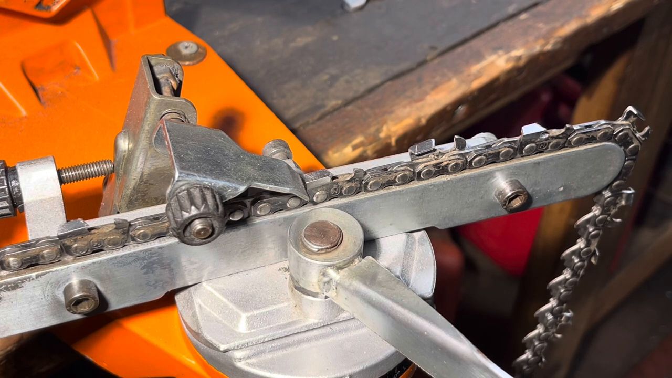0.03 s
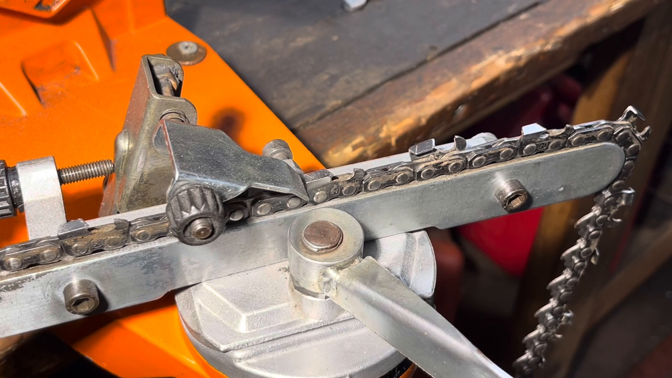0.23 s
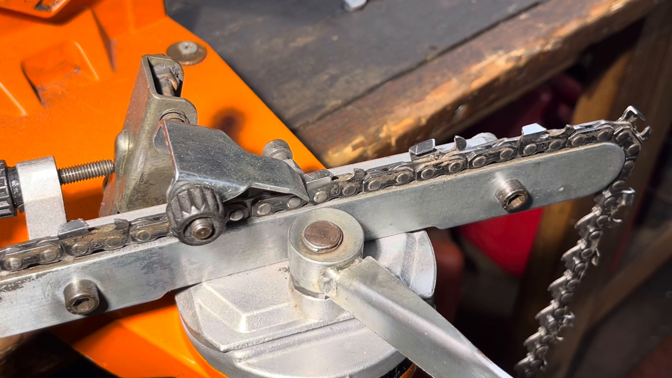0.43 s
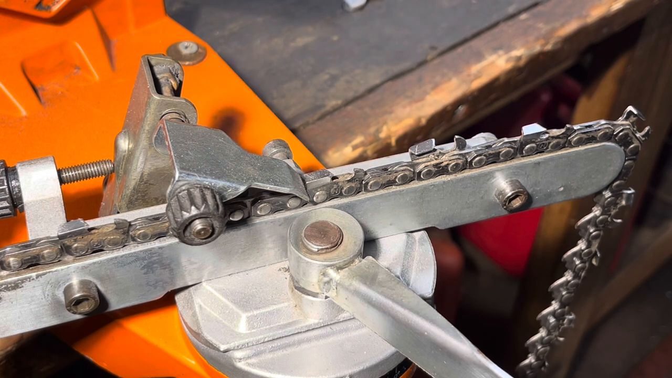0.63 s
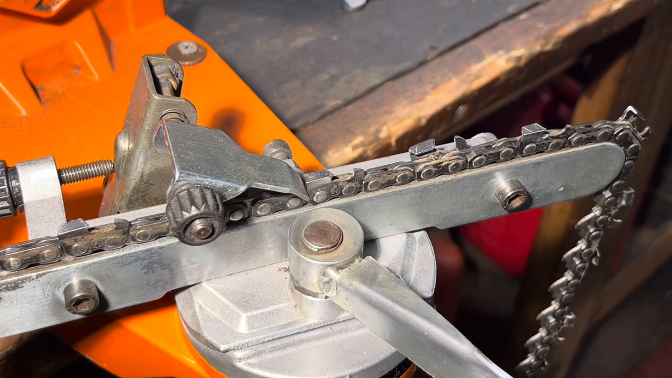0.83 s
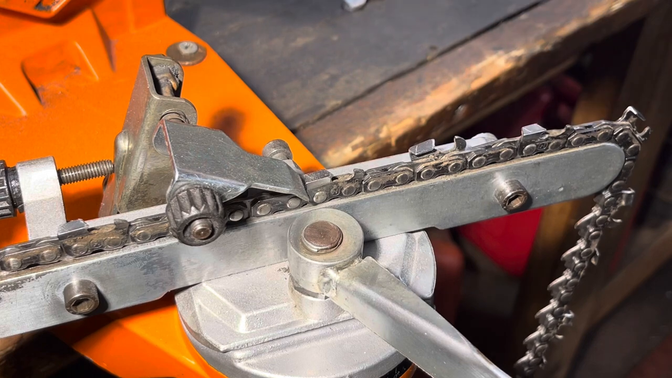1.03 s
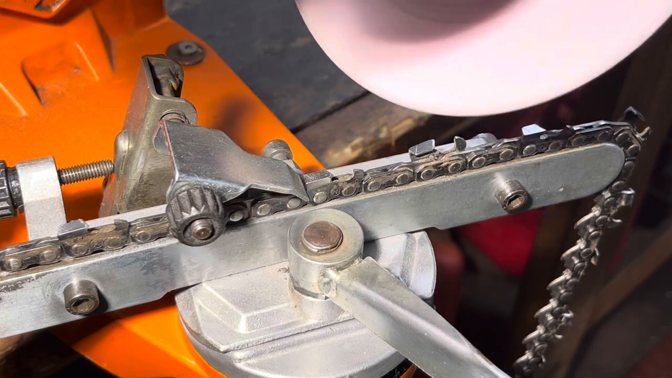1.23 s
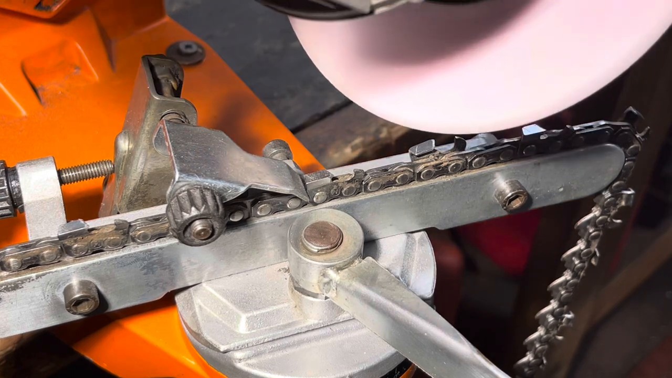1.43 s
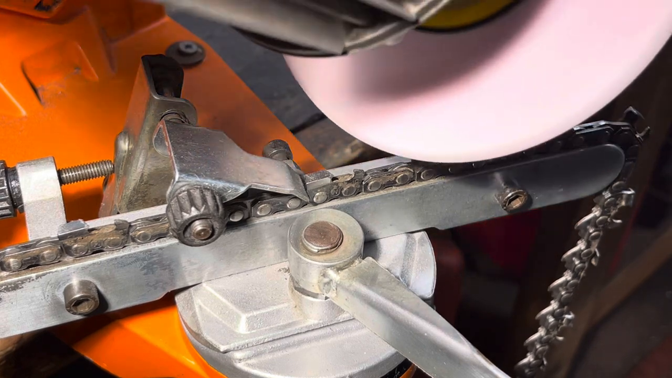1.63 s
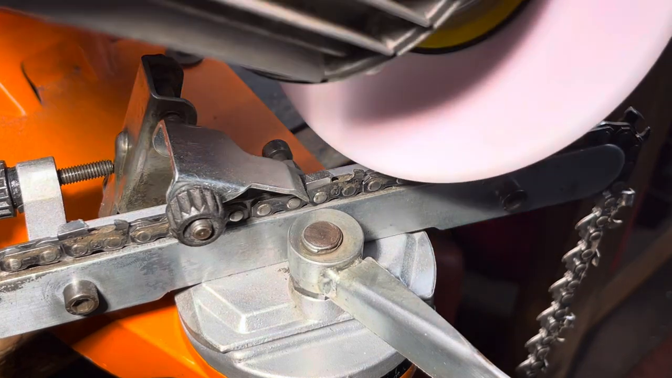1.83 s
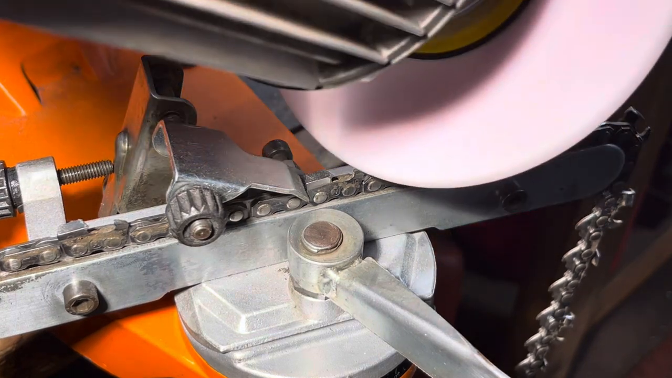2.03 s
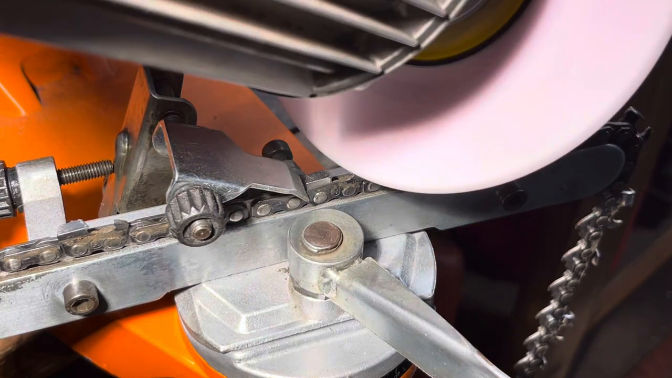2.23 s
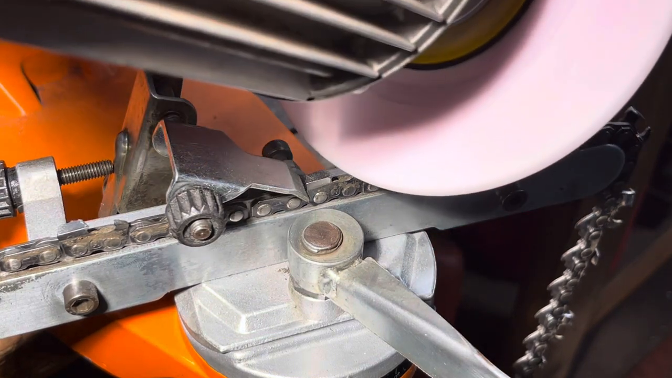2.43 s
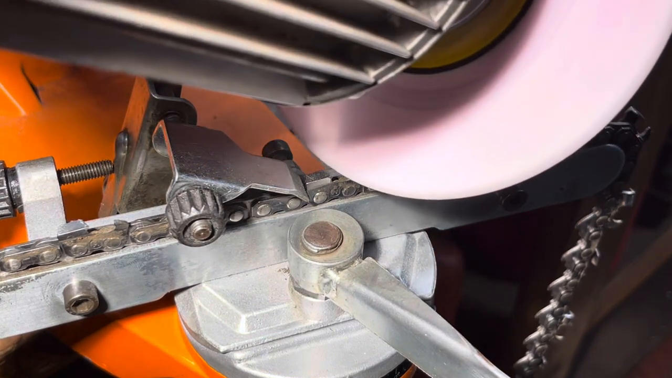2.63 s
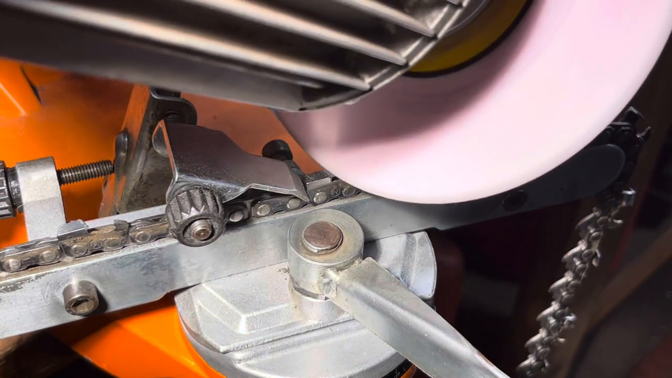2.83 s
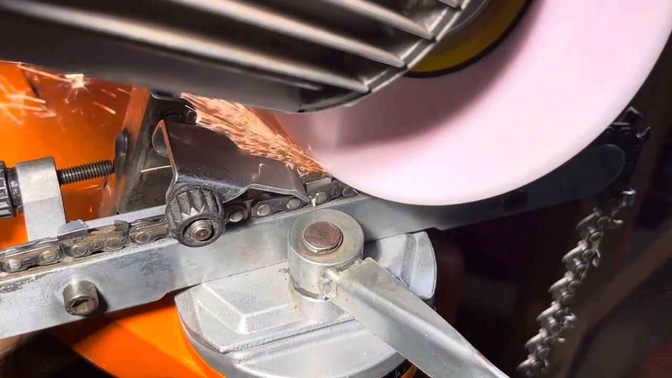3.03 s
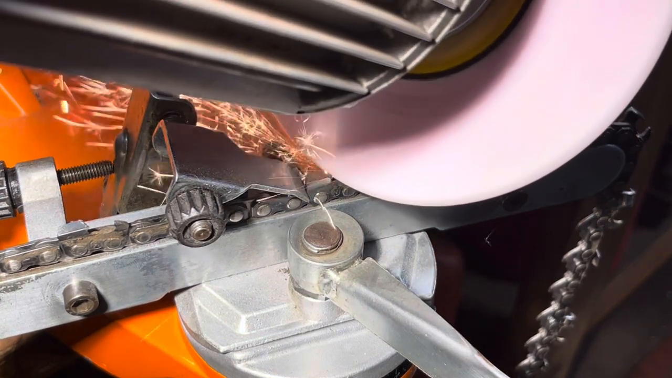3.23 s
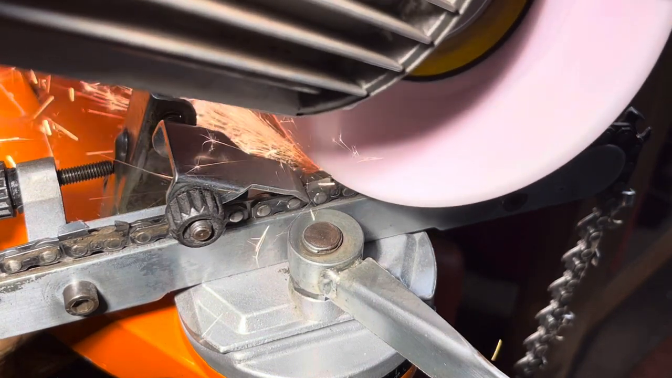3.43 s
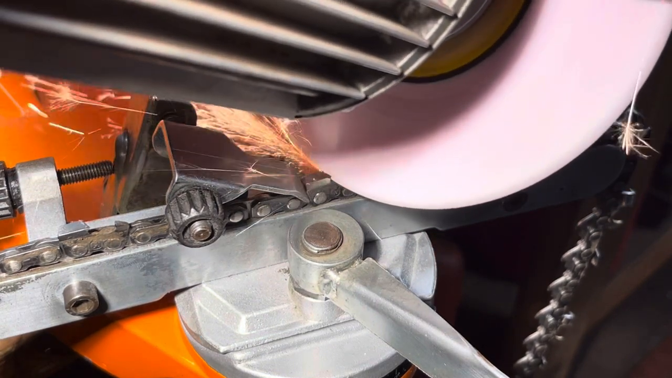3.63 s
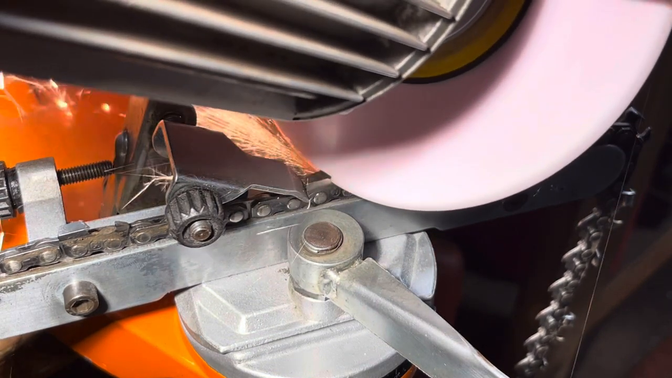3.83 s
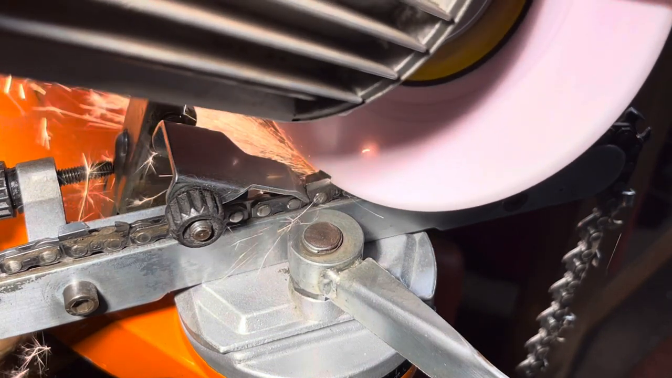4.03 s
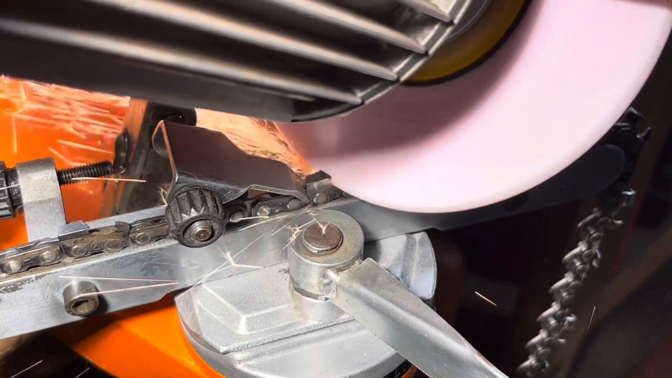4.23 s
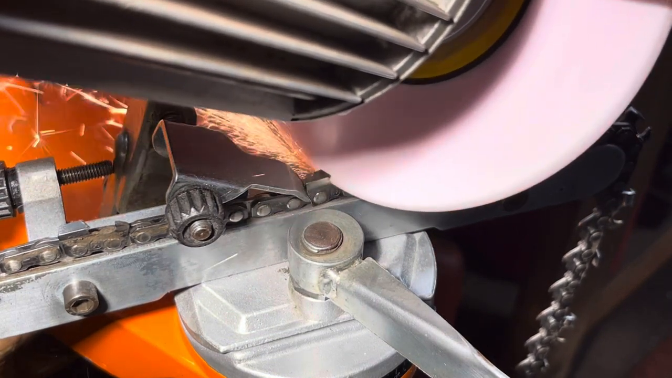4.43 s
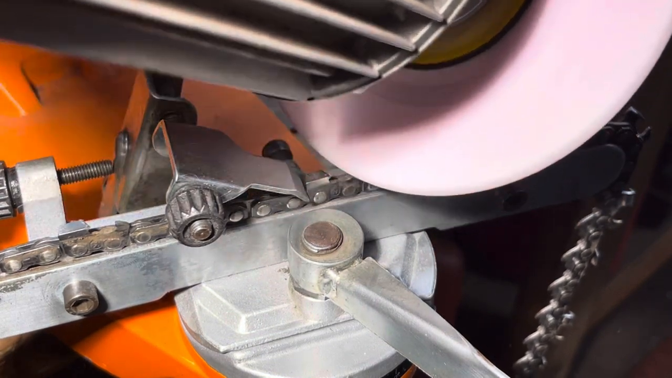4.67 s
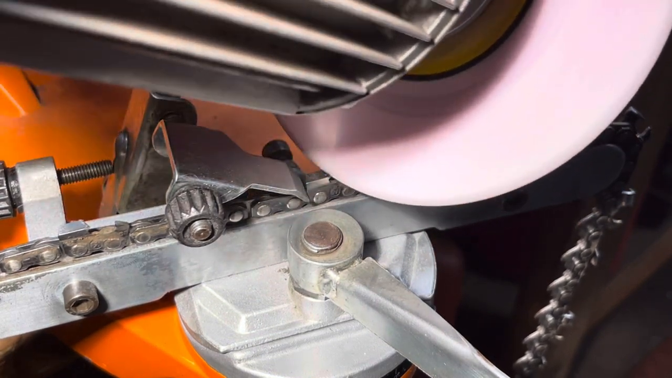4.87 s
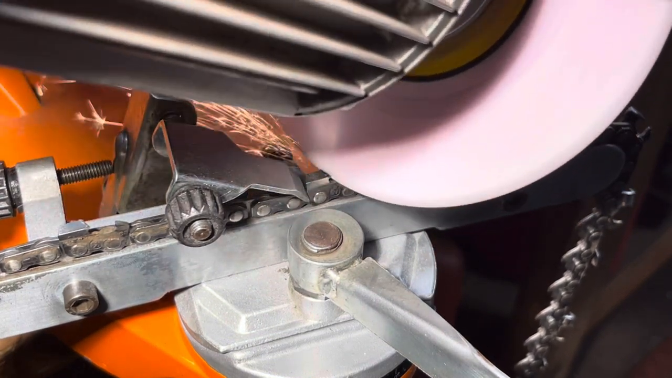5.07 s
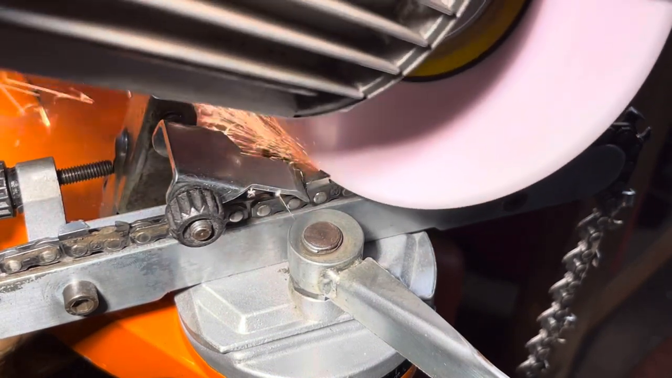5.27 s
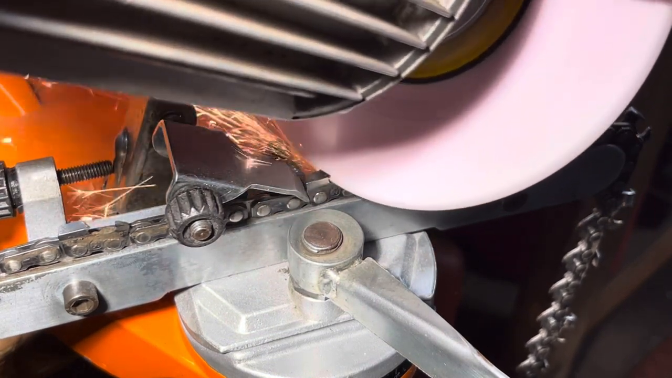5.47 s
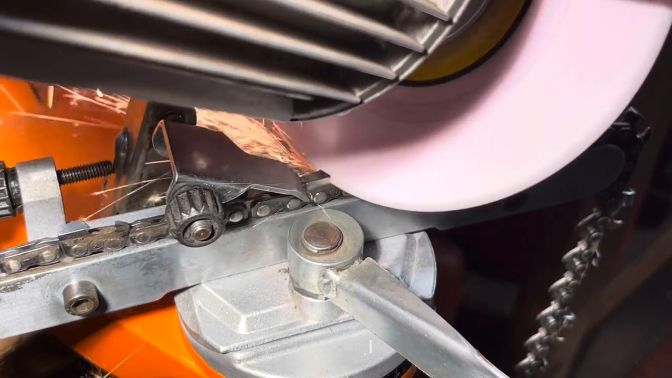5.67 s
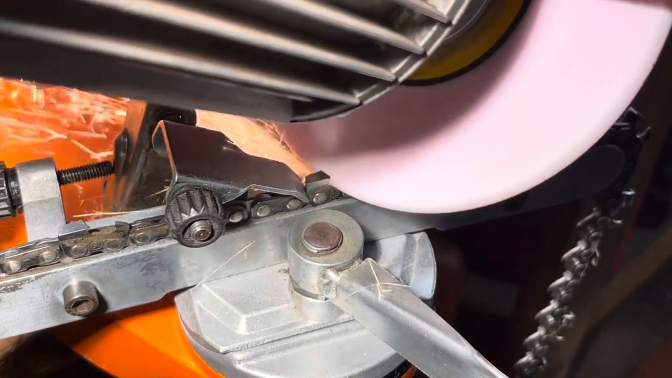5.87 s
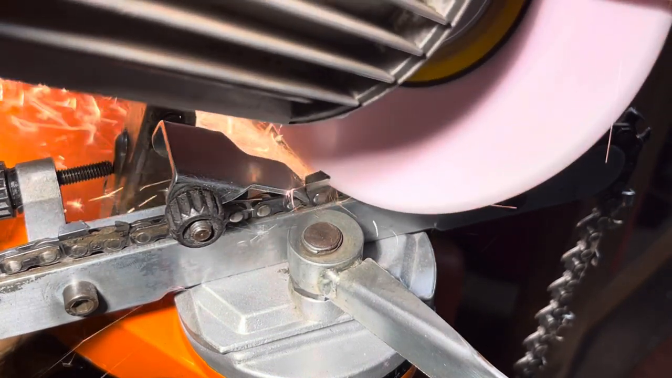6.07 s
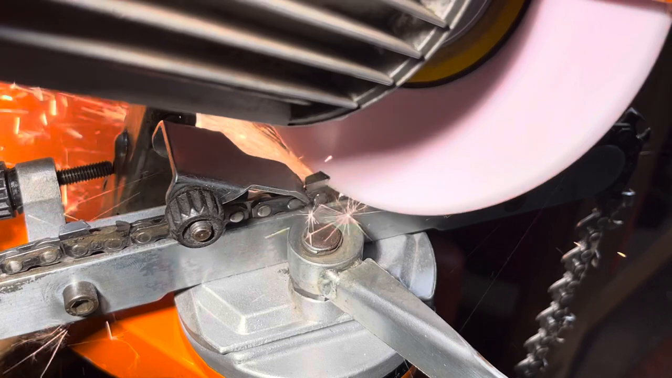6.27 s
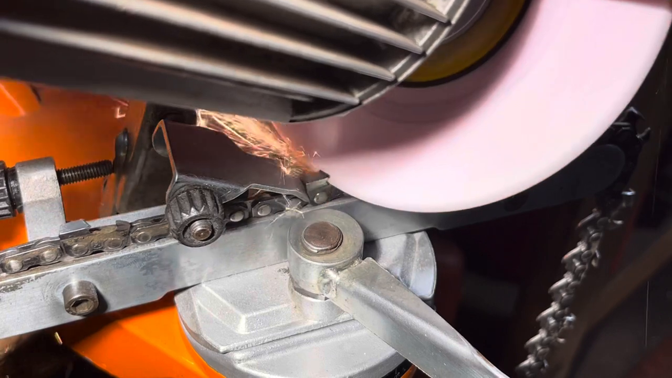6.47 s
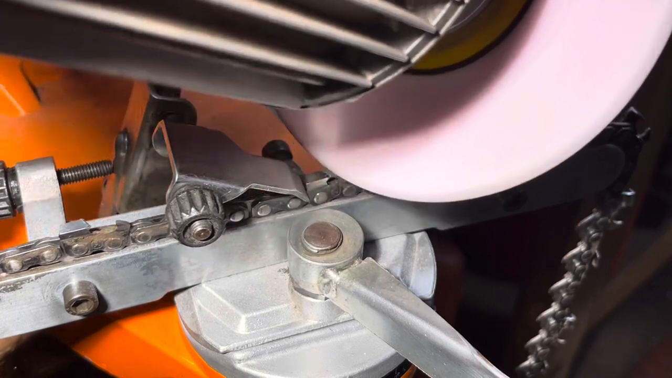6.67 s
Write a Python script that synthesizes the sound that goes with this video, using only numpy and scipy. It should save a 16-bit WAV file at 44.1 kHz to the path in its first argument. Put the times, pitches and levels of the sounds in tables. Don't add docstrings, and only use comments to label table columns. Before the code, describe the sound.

A bench grinder motor growls up to speed and hums, then its abrasive wheel rasps loudly on a saw chain tooth in two harsh, squealing cuts.

```python
import sys
import numpy as np
from scipy import signal
from scipy.fft import rfft, irfft, next_fast_len
from scipy.io import wavfile
from scipy.ndimage import uniform_filter1d, minimum_filter1d, map_coordinates

SR = 44100
rng = np.random.default_rng(int(sys.argv[2]) if len(sys.argv) > 2 else 0)


def to_wav(sig):
    pcm = np.clip(np.atleast_2d(sig), -1, 1) * 32767
    pcm = np.round(pcm).astype(np.int16)
    wavfile.write(sys.argv[1], SR, pcm.T)


def elevation(decibels):
    levels = np.asarray(decibels, float)
    return 10 ** (levels / 20)


N = 295514
T = np.arange(N) / SR

# t/s, rumble level/dB
RUMBLE_LEVEL = [(0, -64.5), (.09, -58), (.26, -43.5), (.43, -41), (1.0, -39.5), (1.3, -36.5), (1.6, -36.5),
                (2.86, -34.5)]
# t/s, speed/Hz
RUN_UP = [(0, 12), (.115, 18), (.15, 32), (.2, 47), (.25, 57), (.33, 59.2), (6.7, 59.2)]
# multiple of shaft speed, level over rumble/dB
SHAFT_ORDERS = [(2, -3.5), (4, -9), (8, -13), (10, -9.5), (20, -13), ]
# f/Hz, level over rumble/dB
STALL_TONES = [(119, 0), (470, -2.5), (1420, -7), (2400, -12)]
# f/Hz, level/dB
WHINE_RAISED = [(2503, -47.5), (3343, -50.5), (3628, -61), (4188, -51), (4237, -52), (4517, -54),
                (4797, -59), (5076, -50)]
# f/Hz, level/dB
WHINE_LOWERED = [(1147, -53), (1480, -44), (1776, -44), (2223, -43), (2503, -41.5), (2552, -46),
                 (2783, -50.5), (3063, -49), (3628, -55.5), (4188, -46.5), (4237, -54), (4517, -66),
                 (4797, -55.5), (5922, -50.5)]
# t/s, lowered/0-1
HEAD_LOWERED = [(0, 0.47), (.95, 0.42), (1.2, 1)]
# f/Hz, level/dB
FAN_AIR = [(180, -21), (300, -3), (600, -6), (850, -8.5), (1400, -3), (2400, -4.5), (3400, -13.5),
           (4500, -14), (6000, -18.5), (7000, -20), (8200, -14), (9500, -24), (12000, -26), (15500, -30)]
# f/Hz, level/dB
BENCH_RUMBLE = [(20, -57), (40, -17.5), (60, -2.5), (110, -0.5), (160, -1), (320, -7), (500, -13),
                (700, -13), (1100, -120)]
# t/s, level/dB, half width/s
BENCH_BOOMS = [(1.55, 2, 0.16), (1.999, 2, 0.046), (2.26, 1.5, 0.025), (4.18, 4, .07), (6.2, 9.5, 0.22)]
WHIRR_DB, WHIRR_LAGS = 1.5, 0.47
DUCK_DB, DUCK_S = 15, 0.46

# touch t/s, lift t/s
CONTACT = [
    (2.862, 4.508),
    (5.012, 6.545),
]
# t/s, level/dB
PRESSURE = [
    [(2.862, -15), (3.05, -15), (3.14, -17.5), (3.52, -14), (3.59, -21), (3.7, -17.5), (4.42, -19),
     (4.46, -24.5), (4.508, -21)],
    [(5.02, -37), (5.045, -26), (5.155, -31.5), (5.175, -24.5), (5.87, -19.5), (5.9, -18), (6.32, -17),
     (6.47, -26), (6.548, -26)],
]
# t/s, speed/Hz
LOADED_SHAFT = [
    [(2.862, 58.98), (3.02, 58.6), (3.15, 58.1), (3.3, 57.87), (3.39, 57.23), (3.716, 56.66), (3.985, 57.2),
     (4.38, 56), (4.464, 57.67)],
    [(5.012, 58.67), (5.13, 59.1), (5.22, 58.83), (5.574, 58.56), (5.85, 57.57), (6.034, 55.24),
     (6.22, 54.27), (6.322, 55.63), (6.456, 57.86)],
]
# t/s, blend/s
GRIPS = [
    (2.8, .01),
    (3.3, .3),
    (4.42, .04),
    (4.8, .1),
    (5.13, .04),
    (5.62, .26),
    (6.36, .1),
]
# vise/dB, rasp/dB, wheel ring/dB, hiss/dB
GRIP_DRIVE = [(13, 12, 10.5, 12.5), (12.5, 15, 12.5, 16.5), (15.5, 11, 15.5, 7.5), (8, 12.5, 17, 13.5),
              (11.5, 13, 14.5, 15.5), (14.5, 8, 16.5, 15), (18, 8, 14, 15.5)]
# f/Hz, width/Hz, level/dB
VISE_FIRST_TOUCH = [(469, 32, -10), (696, 20, -14), (985, 11, -14.5), (1223, 27, 3.5), (1453, 26, -0.5),
                    (1730, 72, -3.5), (2340, 35, -13), (2610, 32, -2.5), (2990, 70, -3.5), (3635, 100, -3),
                    (3780, 50, -10.5), (4530, 76, 0), (4900, 28, -1.5)]
VISE_HARD = [(487, 13, -30), (672, 26, -11), (997, 45, -11), (1195.8, 16, -2), (1378, 26, -3),
             (1833, 110.4, -6), (2475, 180, -18.5), (3034, 130, -3), (3110, 45, -12), (3314, 120, -3.5),
             (3800, 49, -11), (4446, 190, -12), (4710, 320, -6), (5290, 47, 1)]
VISE_LIGHT = [(649, 55, -13.5), (956, 18, 0.5), (1210, 56, -5), (1760, 61, -1), (2026, 20, -26),
              (2390, 11.23, -3), (3020, 93, 1), (3580, 26, 2), (3770, 51, -8), (4205, 99, -30.5),
              (4340, 33, -10.5), (4500, 94, -2), (5000, 170, -3.5), (5420, 43, -3)]
VISE_HARDEST = [(495, 63, -11.5), (956, 27, -5.5), (1220, 66, -5), (1777, 90, -6), (2353, 115, -10.5),
                (2652, 43, 0), (3022, 130, -4.5), (3650, 50, -1), (3890, 60, -7), (4060, 180, -4),
                (4540, 180, -0.5), (4932, 150, 3), (5330, 190, -1.5)]
# f/Hz, width/Hz, level/dB
DISC = [(5891, 22, -44), (6825, 15.7, 11), (7482, 33, -9.5), (8300, 176, -41), (9530, 9.7, -2.5),
        (9790, 42, -8.5), (11290, 64, -15.5), (12570, 13, 6.5), (13950, 24, -1), (13800, 100, -29.5),
        (14850, 60, -21)]
# f/Hz, level/dB
RASP = [(300, -16.5), (600, -25.5), (1200, -17), (2200, -24), (3200, -12.5), (4700, -14), (5800, -21),
        (7300, -27.5), (8300, -20), (10000, -26.5), (13000, -25), (14200, -34), (15800, -31)]
# t/s, peak/dB, thud/dB
SNATCHES = [(5.885, -12.5, -10), (5.9863, -24, -1), (6.031, -30, -6), (6.1738, -5, -3), (6.208, -7, -12),
            (6.235, -10, -1), (6.2516, -12.5, -13.5), (6.264, -14, -4), (6.285, -10.5, -3),
            (6.33, -12.5, 6), (6.3565, -14.5, -8)]
# t/s, length/s, f/Hz, level/dB, fade/dB per s
SQUEALS = [(2.854, 0.15, 2990, -23.5, 3), (2.854, 0.21, 1661, -23, 2.5), (2.876, 0.16, 5040, -24.5, 6),
           (2.987, 0.63, 3003, -12.5, 23), (3.05, 0.79, 694.5, -38, -3), (3.104, .25, 4540, -31, 3),
           (3.199, 0.36, 1678, -23.5, 8), (3.62, 0.32, 1359, -25, 21), (4.099, .35, 463, -44, -12),
           (5.006, 0.23, 2950, -36, 0), (5.2, 0.72, 3020, -42, -2), (5.18, 0.55, 1764, -27.5, 1),
           (2.869, 0.19, 477.4, -29.5, 11), (3.083, 0.51, 1226, -29.5, -4), (5.03, .2, 4590, -38.5, 3)]
FREE_TURNS_HZ, LIFT_T60_S = 59.35, .095
GRITS_PER_TURN = 1024
RENEW_RAD, RENEW_GROWS = .16, .035
SPOT_DB, SPOT_WEARS_S, SPOT_REST_DB = 13, .5, 2.5
TRADE_DB = 1.5
SQUEAL_EDGE_S, SQUEAL_FOLLOWS = 0.026, .45
THROB = .38

# f/Hz, level/dB
TILT_CUT = [(60, -10), (110, -10.5), (200, 2), (380, -2), (700, 4), (1290, 0.5), (2380, -1.5), (4400, -3.3),
            (8120, 1.5), (15000, -0.4)]
TILT_MOTOR = [(60, -7.5), (110, 2.5), (200, 0), (380, 1), (700, 4), (1290, -2), (2380, -4.5), (4400, 1),
              (8120, 4), (15000, -4)]
# f/Hz, phase/rad
PORT_LEAD = [(30, .15), (250, .45), (700, 1.1), (1450, 1.9), (2000, .8), (2600, .3), (5000, -.2),
             (6000, -.8), (6900, -1.3), (7800, -2.8), (8900, -3.4), (10200, -5.1), (11000, -6.0),
             (12300, -6.6), (13300, -7.4), (14400, -8.9), (15800, -9.6)]
# f/Hz, t60/s
SHOP_T60 = [(200, .3), (2000, .22), (6000, .12), (12000, .07)]


def unit(x):
    return x / np.sqrt(np.mean(x ** 2) + 1e-20)


def along(points, hz):
    f, v = np.transpose(points)
    return np.interp(np.log(hz + 1), np.log(f + 1), v)


def curves(rows):
    s, *cols = np.transpose(rows)
    return [np.interp(T, s, c) for c in cols]


def wobble(rate_hz):
    coarse = T[::16]
    knots = rng.standard_normal(int(N * rate_hz / SR) + 4)
    return np.interp(T, coarse, map_coordinates(knots, [coarse * rate_hz]))


def filtered(x, response):
    m = next_fast_len(N + SR // 2)
    return irfft(rfft(x, m) * response(np.fft.rfftfreq(m, 1 / SR)), m)[..., :N]


def band(lo_hz, hi_hz):
    return lambda f: 1 / np.sqrt((1 + (lo_hz / (f + 1)) ** 8) * (1 + (f / hi_hz) ** 8))


def modes(table):
    def response(f):
        return sum((-1) ** k * elevation(db) * 1j * f * width / (hz * hz - f * f + 1j * f * width)
                   for k, (hz, width, db) in enumerate(table))
    return response


def tones(table):
    drift_rad = 0.77 * wobble(13)
    return sum(elevation(db + 1.6 * wobble(13)) * np.sin(2 * np.pi * hz * T + drift_rad) for hz, db in table)


def patchy(depth_db):
    z = signal.stft(rng.standard_normal(N), nperseg=512)[2]
    field = uniform_filter1d(rng.standard_normal(z.shape), size=4, axis=0)
    field = uniform_filter1d(field, size=8, axis=1)
    return signal.istft(z * elevation(depth_db * unit(field)), nperseg=512)[1][:N]


def fan_air(turns, spun):
    air = unit(filtered(patchy(depth_db=1.0), lambda f: elevation(along(FAN_AIR, f))))
    dull = filtered(air, band(300, 1700))
    air = spun ** 0.07 * dull + spun ** 0.51 * (air - dull)
    return air * elevation(0.71 * np.cos(2 * np.pi * turns) + 0.12 * wobble(9.6))


def slip_growl(turns, spun):
    slots = 2.25 * spun ** 0.67 * wobble(450) * np.sin(2 * np.pi * 30 * turns)
    return elevation(10.0) * np.sqrt(np.abs(1 - spun)) * (slots + elevation(-5.0) * tones(STALL_TONES))


def motor():
    rumble_db, = curves(RUMBLE_LEVEL)
    speed_hz, = curves(RUN_UP)
    lowered = np.clip(curves(HEAD_LOWERED)[0], 0, 1)
    turns, spun = np.cumsum(speed_hz) / SR, speed_hz / speed_hz[-1]

    orders = sum(elevation(db + 2.2 * wobble(14)) * np.sin(2 * np.pi * k * turns + .5 * wobble(17))
                 for k, db in SHAFT_ORDERS)
    rumble = rng.standard_normal(N) * elevation(1.3 * wobble(30))
    rumble = unit(filtered(rumble, lambda f: elevation(along(BENCH_RUMBLE, f))))
    boom = elevation(sum(db * np.exp(-((T - s) / width_s) ** 2) for s, db, width_s in BENCH_BOOMS))
    bench = boom * (elevation(-1.0) * rumble + spun * orders)

    whine = elevation(37.5) * lowered * tones(WHINE_LOWERED) + elevation(41.5) * (1 - lowered) * tones(WHINE_RAISED)
    whirr = elevation(2.0) * fan_air(turns, spun) + spun ** 5.9 * whine + slip_growl(turns, spun)
    whirr_db = WHIRR_DB - WHIRR_LAGS * (np.maximum(rumble_db, -45) + 40.5)

    since_touch_s = np.clip(T - CONTACT[0][0], 0, None)
    level_db = rumble_db - DUCK_DB * (1 - np.exp(-since_touch_s / DUCK_S))
    return elevation(level_db) * (bench + elevation(whirr_db) * whirr)


def grit(turns, renewed_rad, uneven_db):
    count = int(turns[-1]) + 2
    order = np.arange(GRITS_PER_TURN // 2 + 1)
    step = np.interp(np.arange(count), turns, renewed_rad)[:, None] * (order / 25) ** .6
    drift = np.cumsum(step * rng.standard_normal((count, len(order))), axis=0)
    phase = rng.uniform(0, 2 * np.pi, len(order)) + drift
    uneven = unit(uniform_filter1d(rng.standard_normal(phase.shape), size=18, axis=0))
    rim = irfft(elevation(uneven_db * uneven) * np.exp(1j * phase), GRITS_PER_TURN).ravel()
    return unit(map_coordinates(rim, [turns * GRITS_PER_TURN]))


def snatches():
    swell, blows = np.ones(N), np.zeros(N)
    for s, db, thud_db in SNATCHES:
        u = np.clip(T - s, 0, None) / .004
        swell += elevation(db + 9) * u * np.exp(1 - u)
        blows[round(s * SR)] = elevation(db + thud_db + 16)
    return swell, filtered(blows, modes([(330, 60, 7), (512, 160, 7.5)]))


def squeal(turns, speed_hz):
    out, waver_db, waver_rad = np.zeros(N), wobble(14), 0.37 * wobble(40)
    for k, (s, length_s, hz, db, fade) in enumerate(SQUEALS):
        a, t = round(s * SR), np.arange(round(length_s * SR)) / SR
        edge = np.clip(np.minimum(t, length_s - t) / SQUEAL_EDGE_S, 0, 1)
        pitch_hz = hz * (speed_hz[a:a + len(t)] / speed_hz[a]) ** SQUEAL_FOLLOWS
        own = slice(k * SR // 3, k * SR // 3 + len(t))
        tone = np.sin(2 * np.pi * np.cumsum(pitch_hz) / SR + waver_rad[own])
        out[a:a + len(t)] += edge * elevation(db - fade * t + waver_db[own]) * tone
    return out * (1 + THROB * np.cos(2 * np.pi * (turns - .2)))


def rung(shares, force):
    def response(table):
        return lambda f: modes(table)(f) + elevation(along(RASP, f))
    return sum(filtered(share * force, response(table)) for share, table in shares)


def cutting():
    speed_hz, = curves(LOADED_SHAFT[0] + LOADED_SHAFT[1])
    pressure_db, = curves(PRESSURE[0] + PRESSURE[1])
    begun = np.array([np.clip((T - s) / blend_s, 0, 1) for s, blend_s in GRIPS] + [0 * T])
    grips = begun[:-1] - begun[1:]
    drive_db = uniform_filter1d(pressure_db, size=400) + np.transpose(GRIP_DRIVE) @ grips
    vise_db, rasp_db, ring_db, hiss_db = drive_db
    trade_db = TRADE_DB * wobble(12)
    load_hz = np.clip(FREE_TURNS_HZ - speed_hz, 0, None)
    renewed_rad = RENEW_RAD + RENEW_GROWS * load_hz ** 2

    turns, touch, free = np.cumsum(speed_hz) / SR, np.zeros(N), np.zeros(N)
    depth_db = np.full(N, SPOT_REST_DB + SPOT_DB)
    for touch_s, lift_s in CONTACT:
        a = round(touch_s * SR)
        lifted_s = np.clip(T[a:] - lift_s, 0, None)
        touch[a:], free[a:] = elevation(-60 * lifted_s / LIFT_T60_S), lifted_s > 0
        worn = np.exp(-((T[a:] - touch_s) / SPOT_WEARS_S) ** 2)
        depth_db[a:] = SPOT_REST_DB + SPOT_DB * np.where(lifted_s > .1, 1, worn)
        turns[a:] += np.ceil(turns[a]) - turns[a]

    high_spot = elevation(-depth_db * (0.5 - np.exp(-(turns % 1 / 0.32) ** 2)))
    high_spot = uniform_filter1d(high_spot, size=130)
    high_spot /= np.sqrt(np.abs(uniform_filter1d(high_spot ** 2, size=2300)))
    swell, thuds = snatches()
    swell = swell / uniform_filter1d(swell, size=4400)
    scrape = grit(turns, renewed_rad, uneven_db=3.5) + .3 * rng.standard_normal(N)
    force = touch * high_spot * swell * elevation(.6 * wobble(25)) * scrape

    first, hard, easing, graze, light, hardest, leaving = grips
    first, hard, hardest = first + graze, hard + easing, hardest + leaving
    low = filtered(elevation(vise_db) * force, band(460, 1870))
    mid = filtered(elevation(rasp_db) * force, band(1850, 5900))
    vise = rung([(first, VISE_FIRST_TOUCH), (light, VISE_LIGHT),
                 (hardest, VISE_HARDEST), (hard, VISE_HARD)], low + mid)

    ring = filtered(elevation(ring_db + trade_db) * force, band(6270, 10660))
    hiss = filtered(elevation(hiss_db - trade_db) * force, band(8830, 23000))
    braked_disc = [(hz, 3.1 * width_hz, db - 5.5) for hz, width_hz, db in DISC]
    braked = np.clip(.9 - first - 0.5 * light - uniform_filter1d(free, size=1500), 0, 1)
    disc = rung([(1 - braked, DISC), (braked, braked_disc)], ring + hiss)
    return vise + disc + thuds + squeal(turns, speed_hz)


def ports(x, tilt):
    def both(f):
        half = np.exp(.5j * along(PORT_LEAD, f)) * elevation(.5 * along(tilt, f))
        return np.array([half, 1 / half])
    return filtered(x, both)


def shop(x):
    hz, t, z = signal.stft(rng.standard_normal((2, SR // 2)), SR, nperseg=256)
    decay = elevation(-60 * t / along(SHOP_T60, hz)[:, None])
    tail = signal.istft(z * decay, SR, nperseg=256)[1]
    late = np.pad(x, (300, 0))[None]
    return signal.fftconvolve(late, tail / np.linalg.norm(tail[0]), axes=1)[:, :N]


def scene():
    hum, cut = motor(), cutting()
    near = ports(cut, TILT_CUT) + ports(hum, TILT_MOTOR)
    return near + shop(filtered(elevation(-14.5) * cut + elevation(-14.0) * hum, band(170, 18000)))


def drop_masked(x, margin_db, beside_db, ragged_db, from_hz, beside_hz):
    z = signal.stft(np.array([x[0] + x[1], x[0] - x[1]]) / 2, nperseg=2048)[2]
    bands = z[:, :1024].reshape(2, 64, 16, -1)
    ragged = elevation(ragged_db * rng.standard_normal((2, 64, z.shape[2])))
    level = np.sqrt(np.mean(np.abs(bands) ** 2, axis=2)) * ragged
    loudest_near = -minimum_filter1d(-level.max(axis=0), size=5, axis=0)
    hz = np.arange(64)[:, None] * SR / 128
    masked = (level < elevation(-margin_db) * level[::-1]) & (hz > from_hz)
    masked |= (level < elevation(-beside_db) * loudest_near) & (hz > beside_hz)
    z[:, :1024] = (bands * ~masked[:, :, None]).reshape(2, 1024, -1)
    mid, side = signal.istft(z, nperseg=2048)[1][:, :N]
    return np.array([mid + side, mid - side])


def roll_off(x):
    return signal.sosfilt(signal.butter(12, 15830, fs=SR, output="sos"), x)


def record(dry):
    rounded = dry / (1 + np.abs(dry / .88) ** 6) ** (1 / 6)
    mix = drop_masked(rounded, margin_db=9.0, beside_db=26.5, ragged_db=1.5, from_hz=2000, beside_hz=7000)
    return roll_off(mix)


dry = scene()
out = record(dry)
to_wav(out)
```